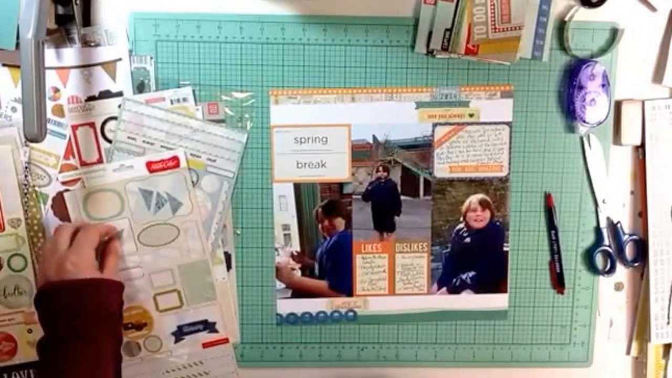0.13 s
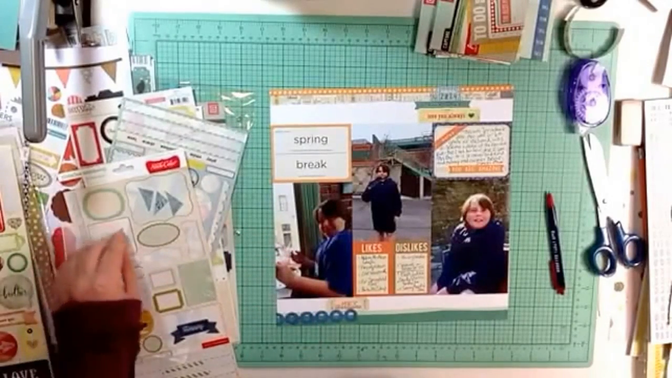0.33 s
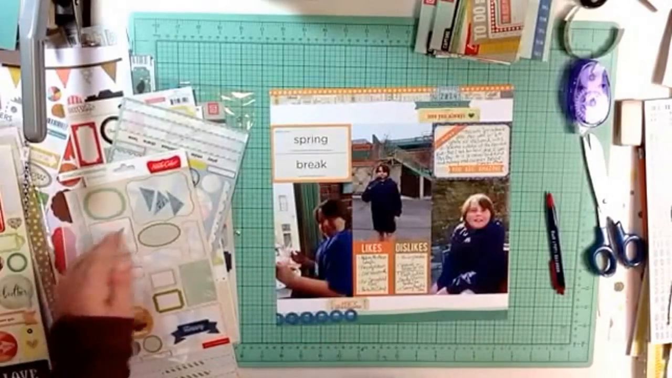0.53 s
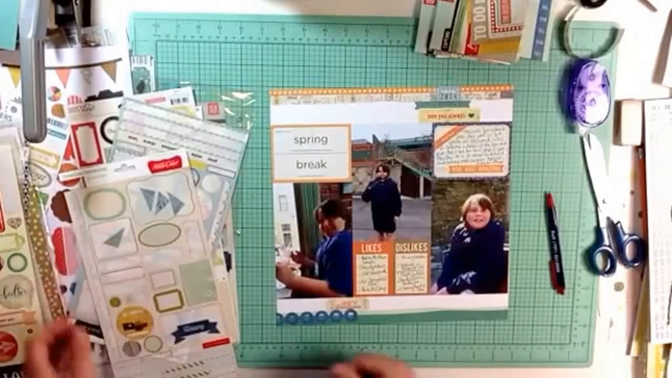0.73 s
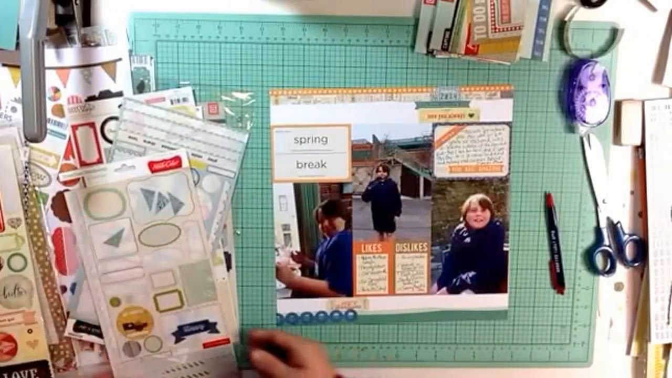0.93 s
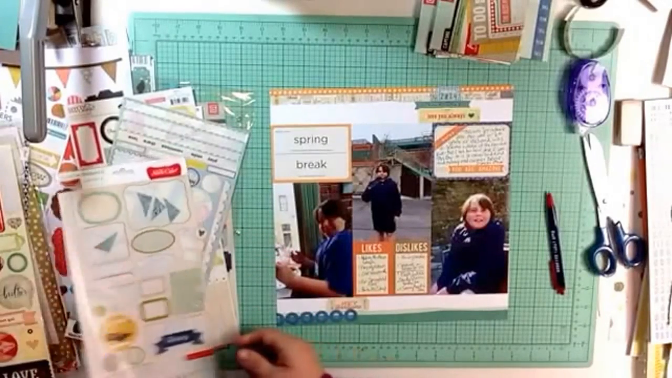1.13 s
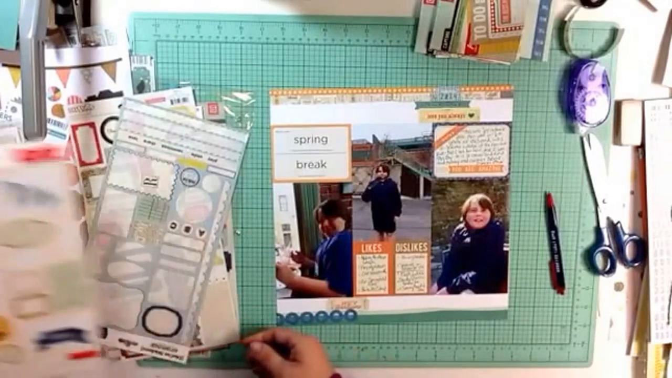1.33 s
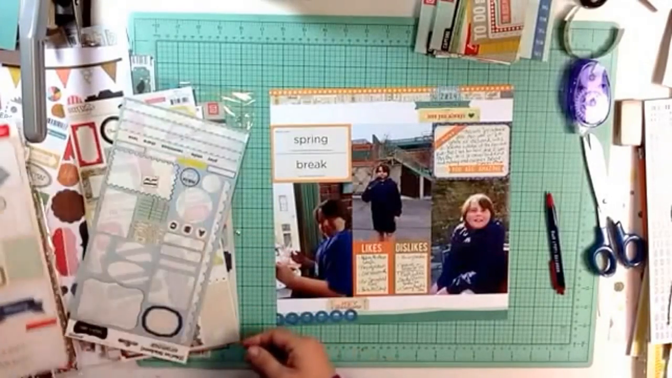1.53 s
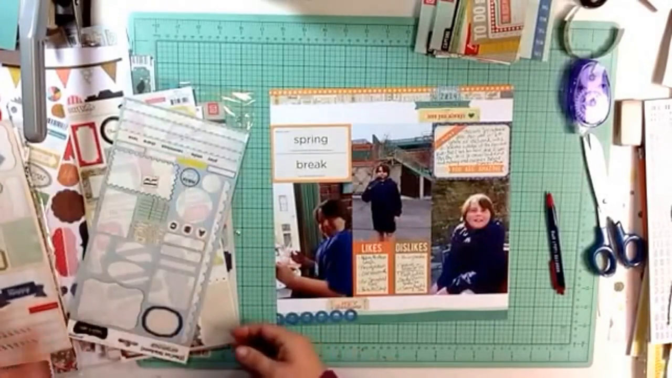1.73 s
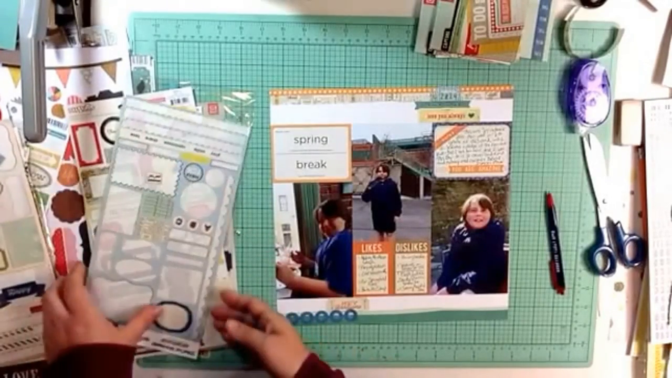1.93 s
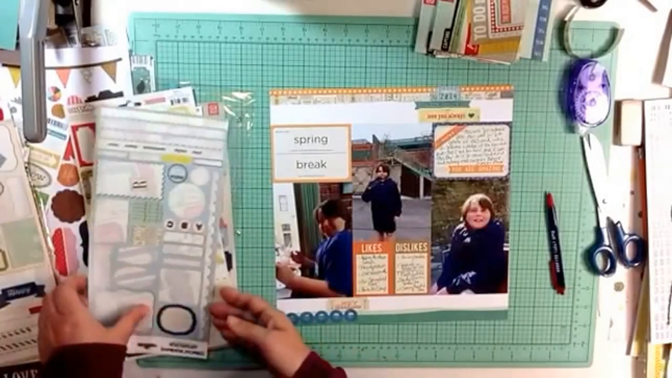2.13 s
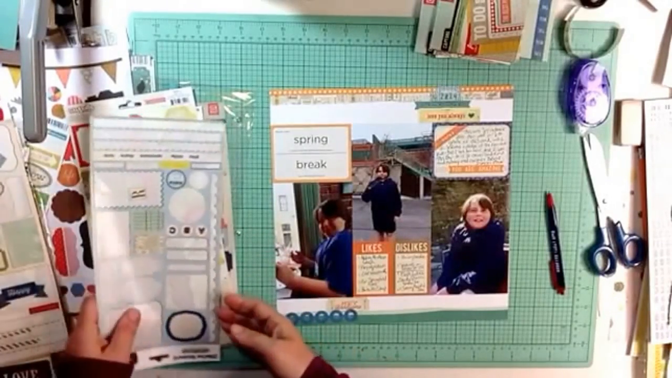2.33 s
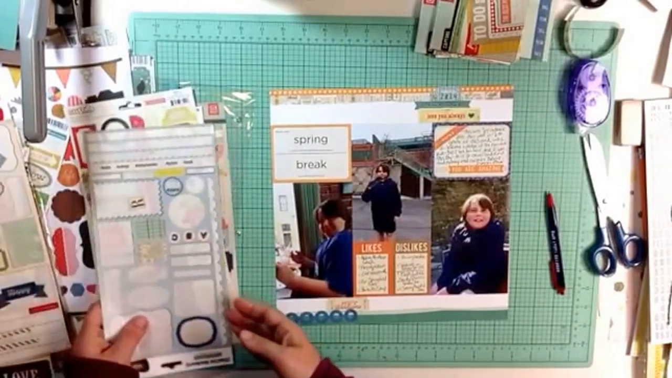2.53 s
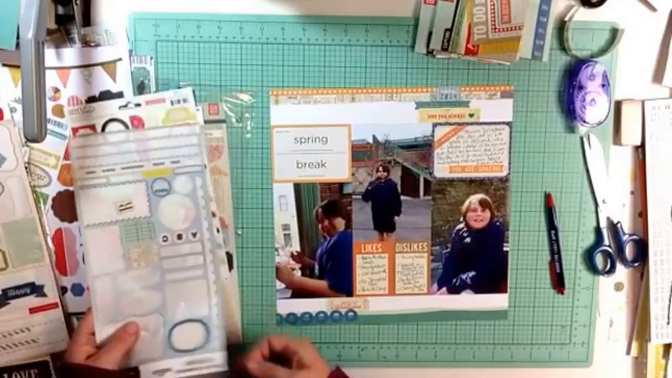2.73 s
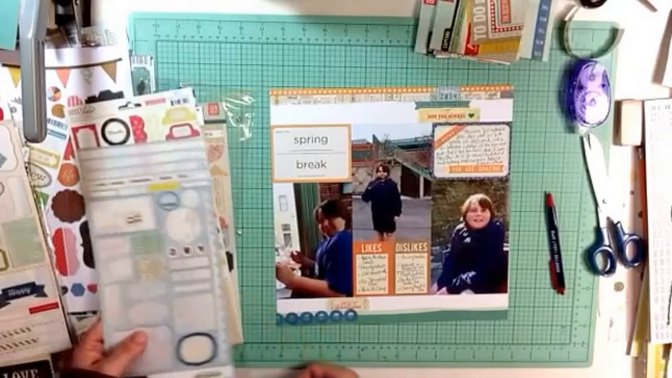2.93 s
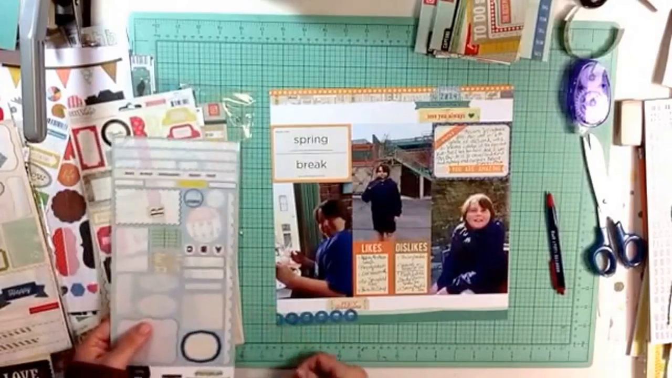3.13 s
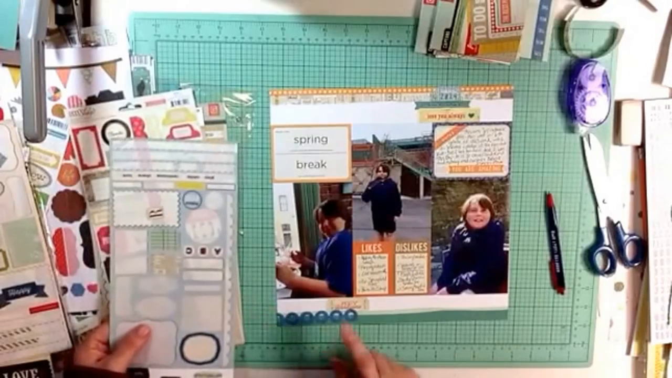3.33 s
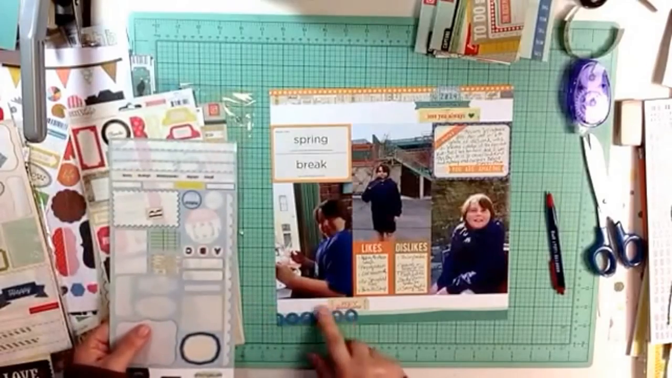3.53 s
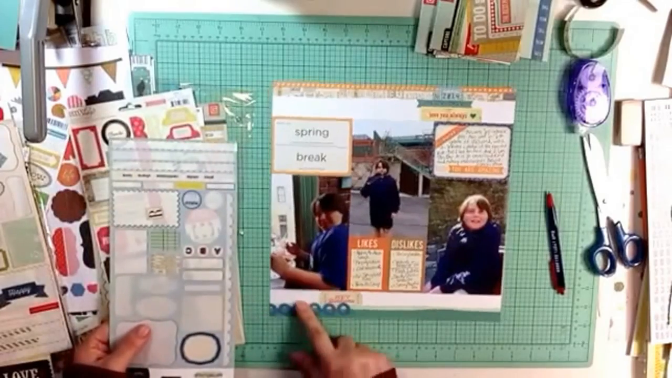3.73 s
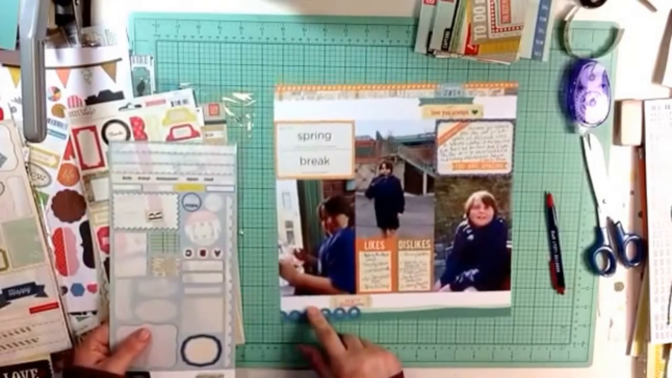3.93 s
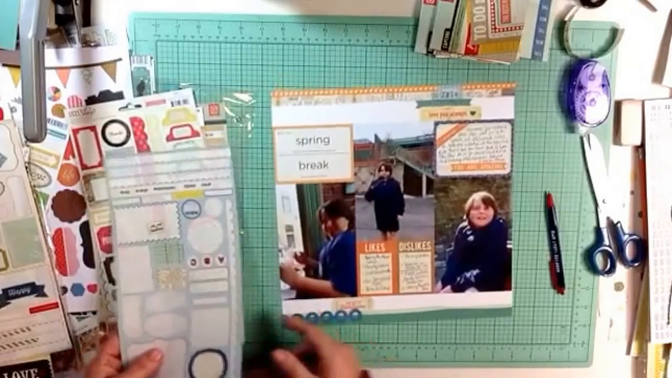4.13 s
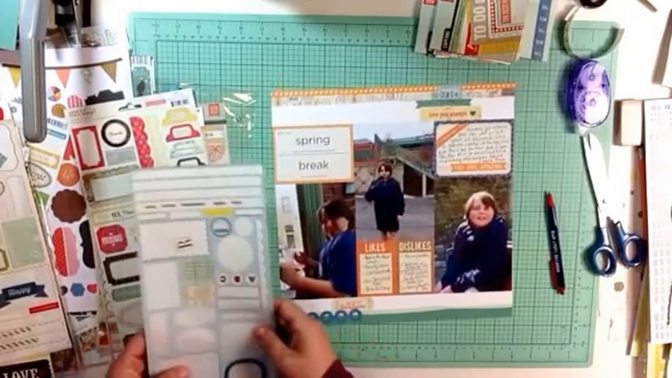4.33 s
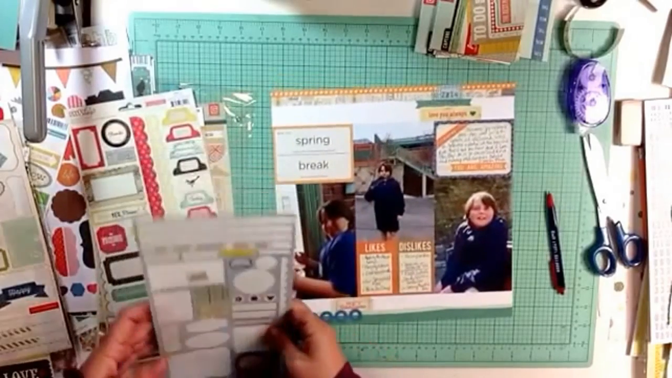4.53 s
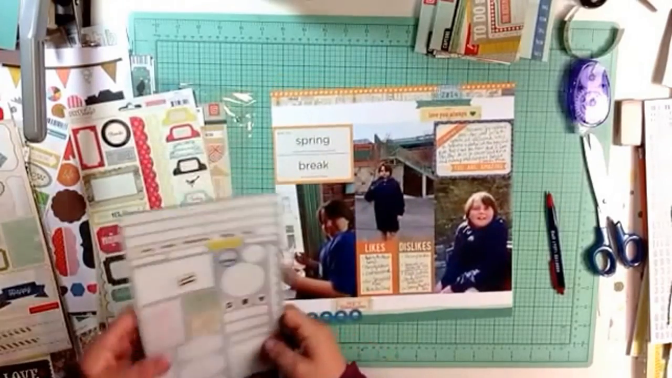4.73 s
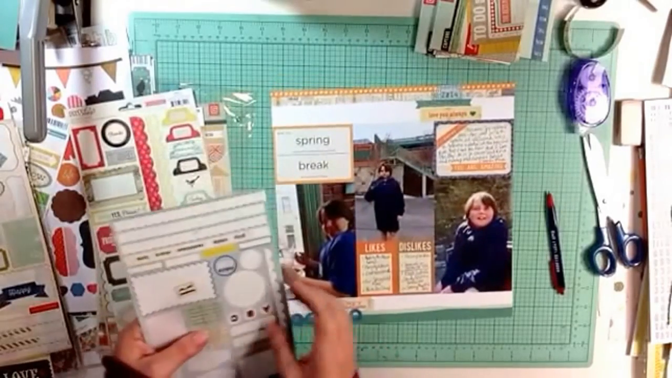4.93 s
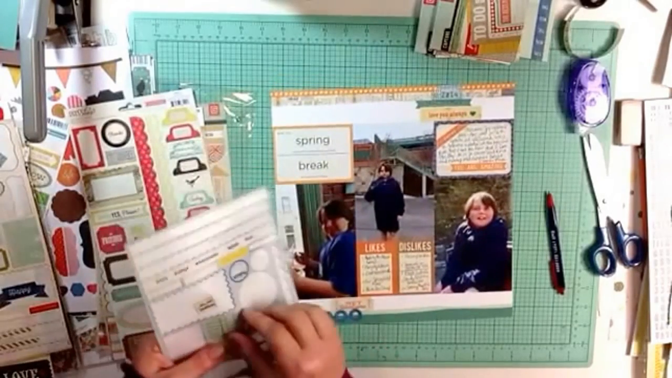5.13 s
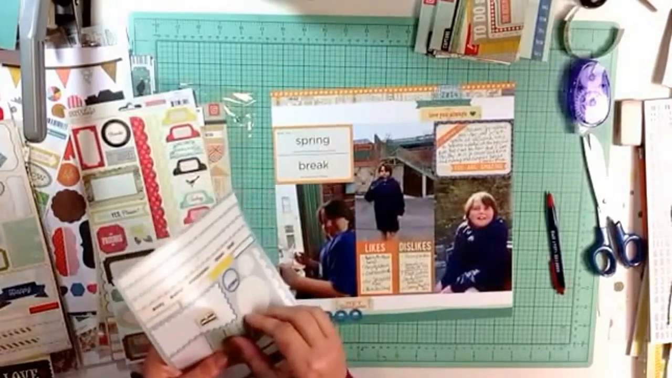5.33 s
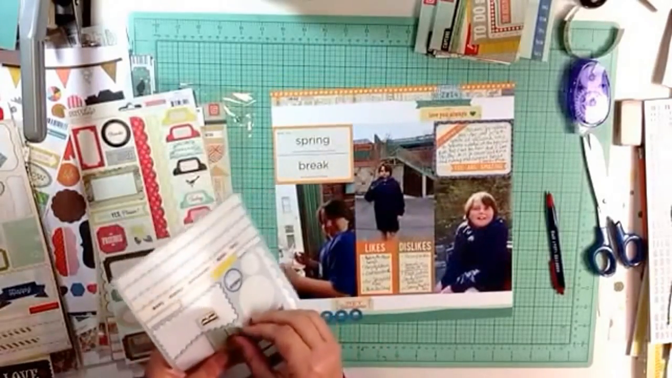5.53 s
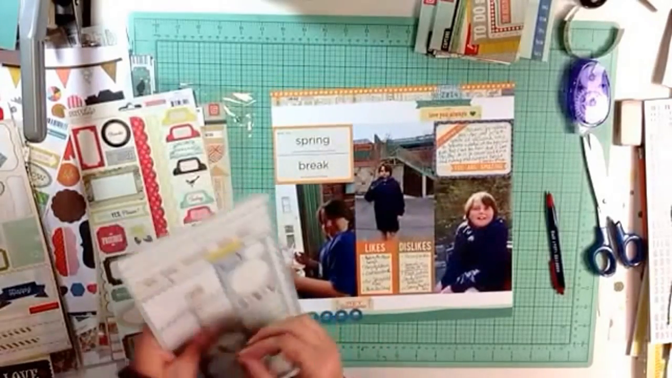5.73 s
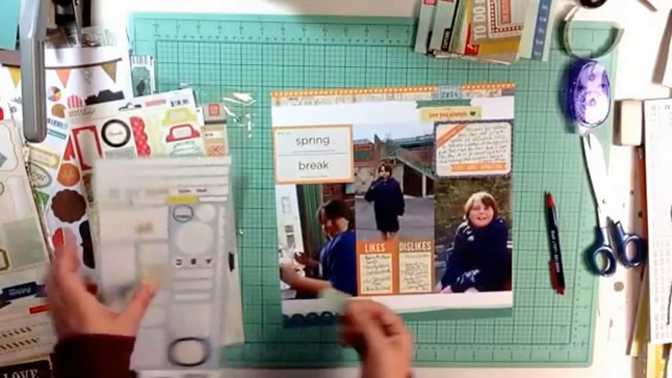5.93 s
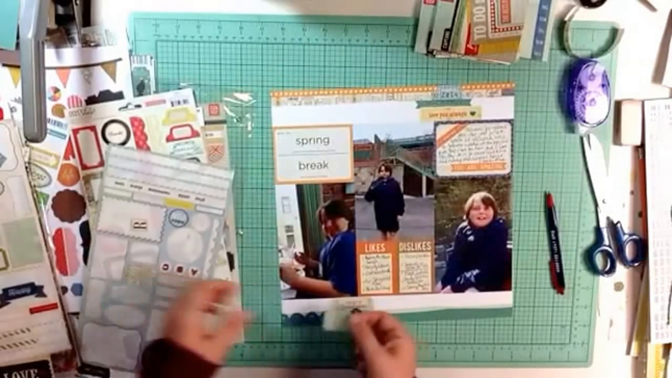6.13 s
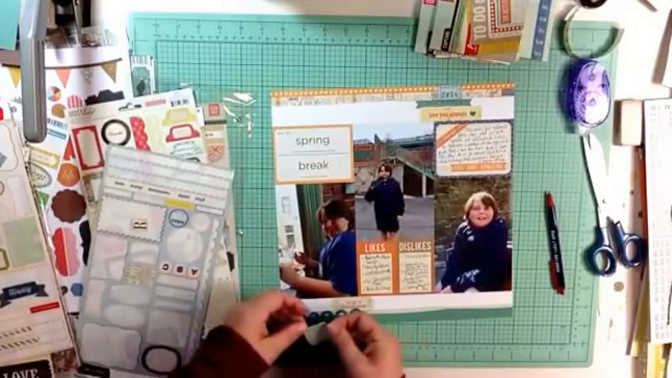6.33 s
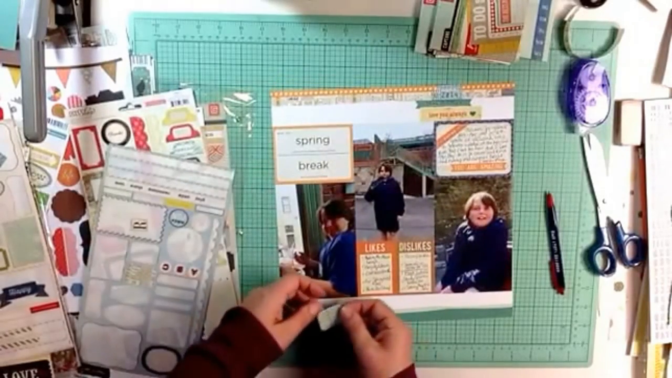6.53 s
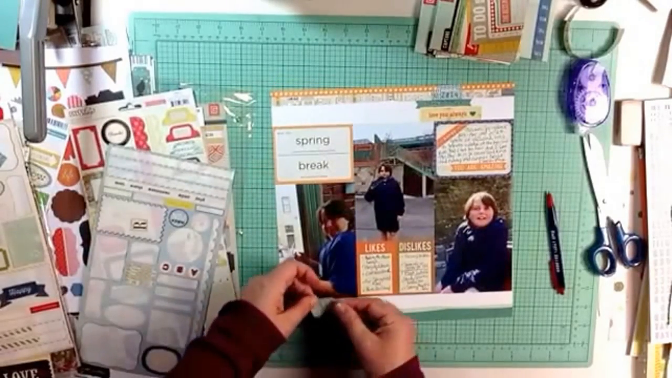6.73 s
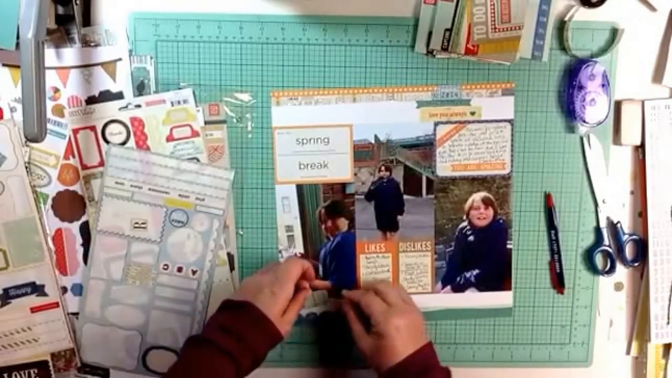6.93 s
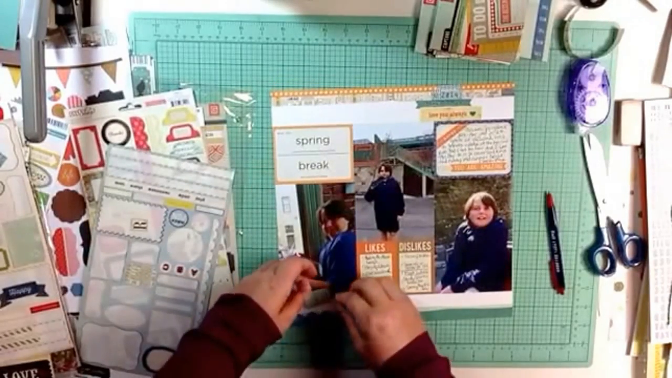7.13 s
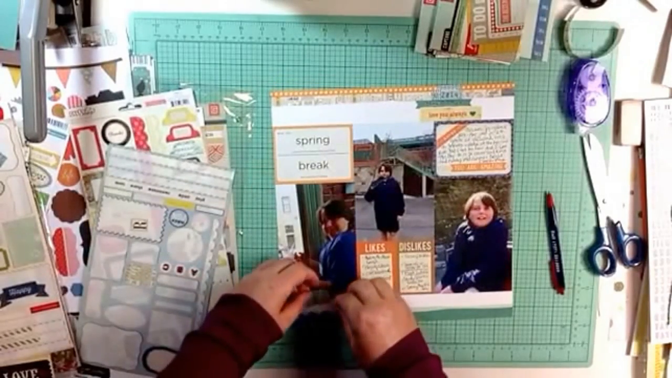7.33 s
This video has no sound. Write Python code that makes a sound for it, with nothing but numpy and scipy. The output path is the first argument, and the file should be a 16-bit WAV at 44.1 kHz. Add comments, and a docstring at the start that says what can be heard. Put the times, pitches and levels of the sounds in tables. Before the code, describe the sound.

Thin plastic film hisses and stiff card scrapes under moving hands. A few light ticks lead to a quick run of weakening snaps and a soft desk thud. Paper is nudged briefly across a mat, then flexible sheets wobble, pop and crinkle loudly. The close microphone catches short room reflections, faint ventilation and low hum, left almost alone at the end.

```python
"""Sticker sheets shuffled in plastic sleeves

Hands shuffle sticker sheets in sleeves on a desk in a small, quiet room. Sliding film and card are noise with
tiny random slips; stiff sheets buckle with dull damped swings, and the film snaps in short bursts of cracks.
A paper page is nudged across the mat with a soft glide, and the lifted stack bumps the desk once.
The room answers the handling with an echo and a noise tail, over a quiet murmur and a low hum."""
import sys
import numpy as np
from scipy import signal
from scipy.fft import rfft, irfft, next_fast_len
from scipy.io import wavfile
from scipy.ndimage import uniform_filter1d, map_coordinates

SR = 44100
rng = np.random.default_rng(int(sys.argv[2]) if len(sys.argv) > 2 else 0)


def wav_record(signal):
    """Record a signal, one row per channel, as 16-bit PCM in the file named by sys.argv[1]."""
    frames = np.transpose(np.atleast_2d(signal))
    bounded = np.clip(frames, -1, 1)
    # unit amplitude maps onto the largest positive 16-bit level
    quanta = np.round(bounded * 32767).astype(np.int16)
    wavfile.write(sys.argv[1], SR, quanta)


N = 329868  # length of the scene in samples
TOP_HZ = 15500  # upper limit of the cracks and of the microphone


def amp(db):
    """Decibels to gain."""
    return 10 ** (np.asarray(db) / 20)


def unit(x):
    """Scaled to rms 1."""
    return x / np.sqrt(np.mean(x ** 2) + 1e-20)


def along(points, hz):
    """Values between (Hz, value) points, read on a logarithmic pitch axis."""
    f, v = np.transpose(points)
    return np.interp(np.log(hz + 1), np.log(f + 1), v)


def wander(rate):
    """A smooth random curve through a given number of random points a second."""
    points = rng.standard_normal(int(N * rate / SR) + 4)
    return map_coordinates(points, [np.arange(N) * rate / SR])


def filtered(x, response):
    """The sound x with each frequency multiplied by response(Hz)."""
    m = next_fast_len(len(x) + SR // 4)
    spectrum = rfft(x, m) * response(np.fft.rfftfreq(m, 1 / SR))
    return irfft(spectrum, m)[:len(x)]


def coloured(x, spectrum):
    """The sound x filtered by a table of (Hz, dB), at rms 1."""
    return unit(filtered(x, lambda hz: amp(along(spectrum, hz))))


def causal(gain):
    """The minimum-phase impulse response of a gain curve: its energy comes as early as possible."""
    cepstrum = irfft(np.log(np.maximum(gain, 1e-6)))
    half = len(cepstrum) // 2
    # fold the second half onto the first, so nothing sounds before the blow
    cepstrum[1:half] *= 2
    cepstrum[half + 1:] = 0
    return irfft(np.exp(rfft(cepstrum)))


def sleeves():
    """Sliding sleeves: film hisses and card scrapes under the same uneven stroke."""
    # One sleeve slides over another. Each row: time of greatest speed in seconds, length in seconds,
    # hiss of the film in dB, scrape of the card in dB, both before the mix below.
    strokes = [(0.98, 0.4, -61.5, -78), (1.11, 0.31, -54.5, -60.5), (1.18, 0.11, -49, -51),
               (1.475, 0.19, -54.5, -58), (1.87, 0.3, -58.5, -56), (1.91, 0.072, -32, -43.5),
               (2.07, 0.49, -52.5, -53), (2.23, 0.22, -52, -39.5), (2.665, 0.27, -68, -49.5),
               (2.925, 0.29, -55.5, -55.5), (3.13, 0.18, -56.5, -66), (3.52, 0.21, -58.5, -86),
               (3.92, 0.34, -55.5, -62.5), (4.27, 0.53, -53.5, -54), (4.8, 0.31, -55.5, -54.5),
               (5.13, 0.23, -58, -55.5), (5.335, 0.081, -51, -49.5), (5.56, 0.25, -51, -50.5),
               (5.67, 0.12, -56, -40), (5.9, 0.43, -59.5, -64.5)]
    # Colour of the film's hiss. Each row: frequency in Hz, relative level in dB per Hz.
    film_colour = [(1200, -18), (3200, -2.5), (6300, -4.5), (14000, 0)]
    # Colour of the card's scrape. Each row: frequency in Hz, relative level in dB per Hz.
    card_colour = [(100, -48), (300, -7), (600, 0), (1400, -2), (3200, -4.5), (5000, -7), (16000, -11)]
    hiss, scrape = friction(strokes)
    unevenness = amp(1.6 * wander(60))
    film = hiss * coloured(grit(rate=3500, spread_db=3, smooth=.4), film_colour)
    card = scrape * coloured(grit(rate=400, spread_db=5, smooth=.3), card_colour)
    return unevenness * (amp(-5) * film + amp(-6.5) * card)


def friction(rows):
    """The hand speeds up and slows down smoothly in every stroke: one gain per sample for each dB column."""
    rise = 0.54  # share of a stroke spent speeding up
    friction_power = 0.79  # friction amplitude grows as this power of speed
    t, power = np.arange(N) / SR, 0
    for s, length, *dbs in rows:
        ramp = np.interp(t, [s - rise * length, s, s + (1 - rise) * length], [0, 1, 0])
        speed = np.sin(np.pi / 2 * ramp) ** 2
        power = power + np.outer(amp(dbs), speed ** friction_power) ** 2
    return np.sqrt(power)


def grit(rate, spread_db, smooth):
    """Friction: tiny slips of uneven size at random moments (rate a second), on a bed of smooth noise."""
    size = amp(spread_db * np.clip(rng.standard_normal(N), -2, 2))
    slips = (rng.random(N) < rate / SR) * rng.choice([-1, 1], N) * size
    return unit(slips) + smooth * rng.standard_normal(N)


def buckles():
    """Stiff sheets buckle or land with a dull pop: the harder a sheet buckles, the sooner it is over."""
    # Each row: start in seconds, level of the swings in dB, pitch of the swings in Hz, level of the dull
    # crack in dB; both levels before the mix.
    rows = [(0.3128, -51.5, 716, -67), (0.9838, -51, 570, -60), (1.1395, -43, 930, -50),
            (1.335, -42.5, 550, -53.5), (1.817, -53.5, 600, -60), (2.1172, -44, 497, -63),
            (2.1546, -37, 455, -50), (2.7275, -43.5, 1010, -61), (2.9261, -42, 2760, -60),
            (3.355, -56, 470, -69), (4.048, -41, 1040, -43.5), (4.069, -42.5, 890, -55),
            (4.0846, -47.5, 1160, -56), (4.111, -49.5, 1480, -54), (4.1878, -37.5, 940, -50),
            (4.2071, -38, 1230, -51), (4.247, -46.5, 1280, -65), (4.2753, -24.5, 1225, -49),
            (4.4479, -41, 1050, -68), (4.482, -48.5, 920, -58), (4.7136, -38, 690, -43.5),
            (4.7446, -35, 660, -34.5), (4.7815, -36, 710, -43), (4.7962, -35, 483, -39),
            (4.9552, -45.5, 940, -70), (5.0552, -39, 620, -44.5), (5.0772, -38, 488, -41),
            (5.129, -49, 600, -58), (5.19, -45, 550, -46), (5.2301, -33.5, 804, -35.5),
            (5.5499, -28, 695, -33.5), (5.611, -33.5, 1240, -47), (5.6288, -33, 665, -46),
            (5.6424, -27.5, 606, -37), (5.969, -55.5, 970, -59)]
    # burst length, the level it holds for, extra level that halves it
    t60_s, ref_db, halving_db = 0.031, -44.5, 17.5
    tilt_db = -27  # treble tilt of the crack, per octave
    events = []
    for s, flex_db, flex_hz, crack_db in rows:
        t60 = t60_s * 2 ** ((ref_db - flex_db) / halving_db)
        events.append((s, flex_db, flex_hz, crack_db, tilt_db, t60))
    return pops(events, flex_q=0.97)


def snaps():
    """The film snaps, singly or in a run from a dragged edge; each snap also swings the sheet a little."""
    # Each row: start in seconds, level of the crack in dB before the mix, treble tilt in dB per octave.
    single = [(0.0866, -50, 21), (0.5496, -54.5, -18), (0.5559, -48, -14), (0.9841, -47, -6.5),
              (1.0375, -52, -29), (1.1803, -39, 5.5), (1.495, -51.5, -31), (2.0416, -38.5, -3),
              (2.1164, -38, -4), (2.1537, -26, -7), (2.3941, -25.5, -6), (2.588, -35.5, -10.5),
              (2.622, -35.5, -16), (2.6963, -44, -28), (2.9102, -42, -34), (3.4384, -50.5, 4),
              (4.2755, -31.5, -5), (4.8695, -37, -19), (5.2301, -37, -12), (5.6109, -28, -1),
              (5.6419, -20.5, -7.5), (5.6699, -28.5, -7), (6.4848, -50.5, -10), (6.7161, -49.5, -6),
              (6.9756, -55, -1)]
    # burst length, the level it holds for, extra level that halves it
    t60_s, ref_db, halving_db = 0.015, -39, 31
    flex_db, flex_hz = -16, 530  # the sheet's swing: level against the crack, pitch
    # a sleeve's edge, dragged over the stack, catches and snaps free at even intervals, ever more weakly
    drag_at_s, drag_gap_s = 2.1485, 0.0499
    drag_db, drag_loss_db, drag_tilt_db = -24.5, 2.5, -2  # first snap, loss per snap, tilt per octave
    run = [(drag_at_s + k * drag_gap_s, drag_db - k * drag_loss_db, drag_tilt_db) for k in range(4)]
    events = []
    for s, db, tilt in single + run:
        t60 = t60_s * 2 ** ((ref_db - db) / halving_db)
        events.append((s, db + flex_db, flex_hz, db, tilt, t60))
    return pops(events, flex_q=0.84)


def pops(rows, flex_q, flex_top=1.82, flex_share=0.77, crack_low_hz=1300, knee_hz=4500,
         thud_db=-24, thud_low_hz=120, size=2048):
    """Each pop is a few damped swings of the sheet and a crack in the film: (swings, cracks)."""
    out, t = np.zeros((2, N + size)), np.arange(size) / SR
    hz = np.fft.rfftfreq(size, 1 / SR) + 1
    for s, flex_db, flex_hz, crack_db, tilt, t60 in rows:
        swing = 1 / (1 + (flex_q * (hz / flex_hz - flex_hz / hz)) ** 2)
        swing = swing / np.hypot(1, (hz / (flex_top * flex_hz)) ** 6)
        # the tilt acts on the treble above the knee
        crack = facet(hz) * amp(tilt * np.log2(np.hypot(1, hz / knee_hz)))
        crack = crack / np.sqrt(1 + (crack_low_hz / hz) ** 4)
        # the crack also jolts the whole sheet a little
        thud = amp(thud_db) / (1 + hz / flex_hz) / (1 + thud_low_hz / hz)
        crack = (crack + thud) / np.sqrt(1 + (hz / TOP_HZ) ** 20)
        swing_layer, crack_layer = out
        for layer, db, colour, life in ((swing_layer, flex_db, swing, flex_share * t60),
                                        (crack_layer, crack_db, crack, t60)):
            blow = unit(signal.fftconvolve(fracture(t, life), causal(colour))[:size])
            # a level counts the energy as if packed into 2 ms
            layer[int(s * SR):][:size] += amp(db) * blow * np.sqrt(.002 * SR / size)
    return out[:, :N]


def fracture(t, t60, snap=1, rise=0.014):
    """A burst of microscopic cracks with an even spectrum; a long one also starts more softly."""
    burst = rng.standard_normal(len(t)) * amp(-60 * t / t60) * (1 - np.exp(-t / (rise * t60)))
    burst[0] += snap
    # even out the spectrum
    power = np.abs(uniform_filter1d(np.abs(rfft(burst)) ** 2, size=9))
    return signal.fftconvolve(burst, causal(power ** -.5))[:len(t)]


def facet(hz, depth_db=2.2, per_octave=3):
    """Every patch of film has its own broad resonances: a random gain curve."""
    octaves = np.log2(1 + hz / 500)
    return amp(depth_db * map_coordinates(rng.standard_normal(32), [per_octave * octaves]))


def crinkle(cracks, settle_s=0.03, crinkle_db=-11, count=5):
    """After each crack several creases settle in a dwindling spatter of small cracks, each with its own colour."""
    # Colour of the small cracks. Each row: frequency in Hz, relative level in dB per Hz.
    crease_colour = [(200, -59), (700, 16.5), (3000, 0.5), (15000, -4.5)]
    keep = np.exp(-1 / (settle_s * SR))
    strain = np.sqrt(signal.lfilter([1 - keep], [1, -keep], cracks ** 2))
    hz, t = np.fft.rfftfreq(512, 1 / SR), np.arange(512) / SR
    ticks = np.zeros(N)
    for _ in range(count):
        tick = np.convolve(fracture(t, t60=0.0043), causal(facet(hz) ** 3))
        ticks += signal.fftconvolve(grit(rate=35, spread_db=3, smooth=0), unit(tick))[:N]
    return amp(crinkle_db) * strain * coloured(ticks, crease_colour)


def bending(swings):
    """The slow swings of a buckle set the whole sheet rumbling with small soft buckles that die away."""
    # Colour of the rumble. Each row: frequency in Hz, relative level in dB per Hz.
    wobble_colour = [(90, -45), (220, -6), (650, 0.5), (900, -6), (2000, -18.5), (6000, -39)]
    wobble_db, wobble_t60_s = -1.5, 0.37  # level against the strain, decay time
    below_hz = 720  # mostly swings below this pitch feed the wobble
    keep = np.exp(-2 * np.log(1000) / (wobble_t60_s * SR))
    slow = signal.sosfilt(signal.butter(N=4, Wn=below_hz, fs=SR, output="sos"), swings)
    strain = np.sqrt(signal.lfilter([1 - keep], [1, -keep], slow ** 2))
    return amp(wobble_db) * strain * coloured(grit(rate=200, spread_db=3, smooth=0.13), wobble_colour)


def page():
    """A finger pushes the paper page over the cutting mat: dense small slips make a soft glide."""
    # Each row: time of greatest speed in seconds, length in seconds, level in dB before the mix below.
    pushes = [(3.585, 0.12, -60), (3.705, 0.19, -56), (3.84, 0.2, -58)]
    # Colour of the glide. Each row: frequency in Hz, relative level in dB per Hz.
    paper_colour = [(500, -34), (1600, -15), (3000, -6.5), (3400, 2), (6000, -3.5), (15000, -5)]
    glide = grit(rate=3000, spread_db=4, smooth=1)
    return amp(-3.5) * friction(pushes)[0] * coloured(glide, paper_colour)


def thump(at_s=2.149, thump_db=-54, t60=0.29, peak_hz=170):
    """The lifted stack bumps the desk, which answers with a dull thud: low noise that dies away."""
    since = np.maximum(np.arange(N) / SR - at_s, 0)
    noise = rng.standard_normal(N)
    boom = unit(filtered(noise, lambda hz: (hz / peak_hz) ** 2 / (1 + (hz / peak_hz) ** 2) ** 2))
    return (since > 0) * amp(thump_db - 60 * since / t60) * boom


def body(x, size=4096):
    """Sheets and desk resonate, which favours a few pitches and holds one broad band back."""
    # Each row: centre in Hz, width in Hz, boost (or cut) in dB.
    resonances = [(513, 32, 1.5), (606, 9, 7), (685, 13, 5.5), (808, 270, -4), (1275, 126, 2),
                  (3330, 150, 2.5), (6800, 600, 1.5)]
    hz = np.fft.rfftfreq(size, 1 / SR)
    gain_db = sum(db / (1 + (2 * (hz - centre) / width) ** 2) for centre, width, db in resonances)
    return signal.fftconvolve(x, causal(amp(gain_db)))[:N]


def room(x, echo_s=.0076, echo_db=-7, build_s=0.0021, count=6):
    """The room's answer: one near surface echoes, then a diffuse tail that differs from spot to spot on the sheet."""
    # How long the tail lasts. Each row: frequency in Hz, time to fall by 60 dB in seconds.
    tail_times = [(200, 0.37), (700, 0.23), (5000, 0.33), (15000, 0.2)]
    # Strength of the tail. Each row: frequency in Hz, level in dB.
    tail_levels = [(200, -5), (1000, -3), (4000, -1.5), (14000, 1.5)]
    out = amp(echo_db) * np.pad(x, (int(echo_s * SR), 0))[:N]
    spot = np.arange(N) // (SR // 100) % count  # the next spot every 10 ms
    for k in range(count):
        hz, t, z = signal.stft(rng.standard_normal(SR // 2), SR, nperseg=256)
        decay = amp(-60 * t / along(tail_times, hz)[:, None]) * (1 - np.exp(-t / build_s))
        energy = np.mean(decay ** 2, axis=1, keepdims=True) * SR / 2
        decay *= amp(along(tail_levels, hz))[:, None] / np.sqrt(energy)
        tail = signal.istft(z * decay, SR, nperseg=256)[1]
        # fade smoothly from spot to spot
        share = np.sin(np.pi / 2 * uniform_filter1d(1. * (spot == k), size=200))
        out += signal.fftconvolve(x * share, tail)[:N]
    return out


def background(air_db=-61.5):
    """Ventilation murmur and faint hiss are coloured noise; the hum is sines wavering in level and phase."""
    # Steady hum. Each row: frequency in Hz, middle level in dB.
    hum_tones = [(59.6, -97.5), (122.5, -75.5)]
    # Colour of murmur and hiss. Each row: frequency in Hz, relative level in dB per Hz.
    quiet_colour = [(25, -42), (50, -20), (95, -21), (122, -4.5), (148, -6.5), (175, -1), (270, -0.5),
                    (355, -2), (500, -13), (780, -13.5), (1100, -19.5), (1650, -22), (2250, -17),
                    (3200, -24.5), (5200, -25.5), (9500, -24), (15000, -24.5)]
    t, hum = np.arange(N) / SR, 0
    for hz, db in hum_tones:
        level = amp(db + 2 * wander(5.3)) * np.sqrt(2)
        hum = hum + level * np.sin(2 * np.pi * hz * t + 0.71 * wander(18))
    return hum + amp(air_db) * coloured(rng.standard_normal(N), quiet_colour)


def scene(flex_room_db=-4.0):
    """All handling sounds with the room's answer, then the desk thud and the background."""
    buckled = buckles()
    swings, cracks = amp(1) * (buckled + snaps())
    flex = body(swings + bending(buckled[0]))
    film = body(cracks + crinkle(cracks) + sleeves() + page())
    # a flexing sheet faces the microphone and sends less into the room
    answer = room(film + amp(flex_room_db) * flex)
    return (flex + film + answer + thump() + background())[None]


def record(dry):
    """The microphone keeps nothing above its band limit."""
    return np.array([filtered(x, lambda hz: hz < TOP_HZ) for x in dry])


dry = scene()
out = record(dry)
wav_record(out)
```